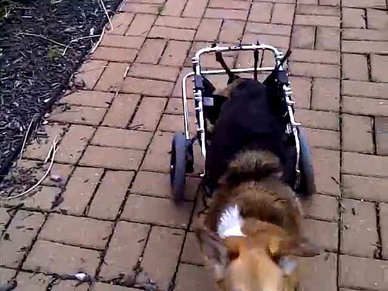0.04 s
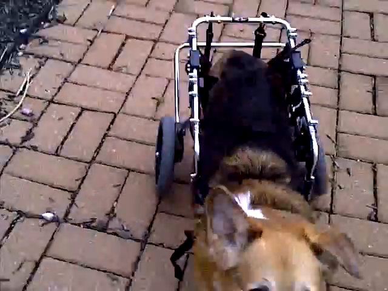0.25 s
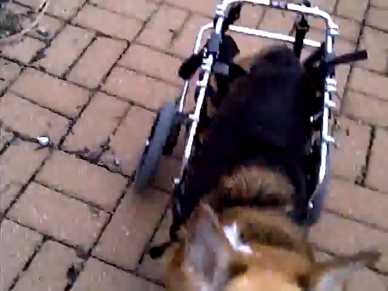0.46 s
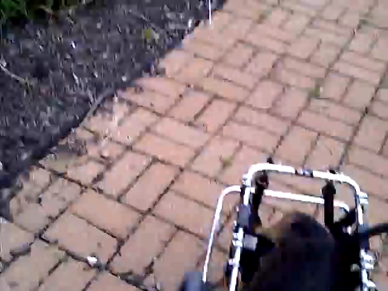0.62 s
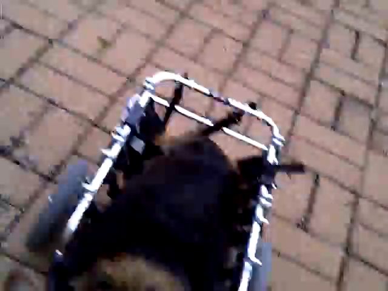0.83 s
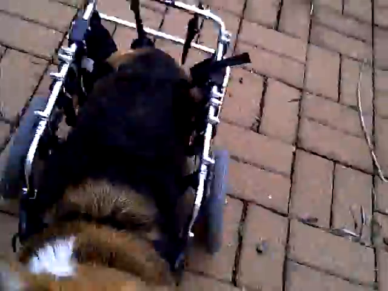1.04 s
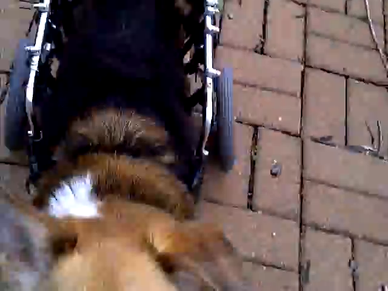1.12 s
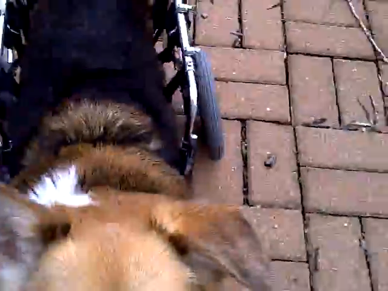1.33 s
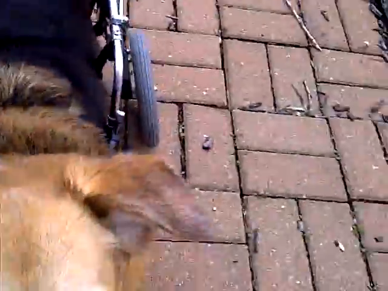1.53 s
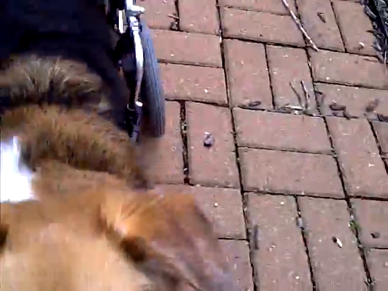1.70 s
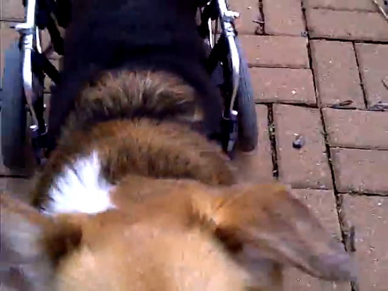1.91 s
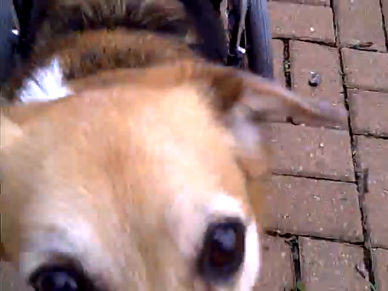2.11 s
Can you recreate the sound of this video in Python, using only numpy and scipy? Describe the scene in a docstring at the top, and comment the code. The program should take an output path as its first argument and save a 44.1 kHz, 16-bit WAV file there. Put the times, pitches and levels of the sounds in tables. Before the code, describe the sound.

A small cart rolls and knocks over bricks outdoors, close by, with sharp clicks from its fittings and a dog's claws. Rustling strokes of fur join in, then ease as a distant bird's thin falling whistles come through.

```python
"""A dog in a two-wheeled cart walks up a brick path, close by.
From the start the tyres rumble and hiss, claws and fittings click, and the frame knocks over the joints.
Almost at once a small bird joins in from behind with thin falling whistles.
From about half a second, fur brushes past in strokes. In the second half the frame drones three times
on rough bricks, and near the end the bird sings its loudest."""
import sys
import numpy as np
from scipy import signal
from scipy.fft import rfft, irfft, next_fast_len
from scipy.io import wavfile
from scipy.ndimage import map_coordinates

SR = 44100
rng = np.random.default_rng(int(sys.argv[2]) if len(sys.argv) > 2 else 0)


def generate_wav(signal):
    """Clip the signal to [-1, 1] and save it as 16-bit WAV at the path in sys.argv[1]."""
    frames = np.transpose(np.atleast_2d(signal))
    scaled = np.clip(frames, -1, 1) * 32767
    pcm = np.round(scaled).astype(np.int16)
    wavfile.write(sys.argv[1], SR, pcm)


N = 94815


def amp(db):
    """Turn decibels (dB) into a number to multiply by."""
    return 10 ** (np.asarray(db) / 20)


def unit(x):
    """Scale a sound to an average strength (rms) of 1."""
    return x / np.sqrt(np.mean(x ** 2) + 1e-20)


def gains(rows):
    """Turn rows of time and levels into one volume curve per level column."""
    times, *columns = np.transpose(rows)
    return [amp(np.interp(np.arange(N) / SR, times, db)) for db in columns]


def wobble(rate):
    """A smooth curve through `rate` random values a second."""
    return map_coordinates(rng.standard_normal(2000), [np.arange(N) * rate / SR], mode="wrap")


def filtered(x, response):
    """Turn each frequency up or down by response(hz)."""
    size = next_fast_len(N + 8192)
    return irfft(rfft(x, size) * response(np.fft.rfftfreq(size, 1 / SR)), size)[:N]


def coloured(x, tone):
    """Shape a sound's bass and treble with a tone table, at strength 1."""
    points_hz, db = np.transpose(tone)
    return unit(filtered(x, lambda hz: amp(np.interp(np.log(hz + 1), np.log(points_hz), db))))


def noise(tone):
    """A steady rush with the given tone."""
    return coloured(rng.standard_normal(N), tone)


def bristles(slips_per_s=2200, share=0.34):
    """Many tiny slips, as of hair or grit, over a smooth rush."""
    slips = (rng.random(N) < slips_per_s / SR) * rng.standard_normal(N)
    return np.sqrt(share) * unit(slips) + np.sqrt(1 - share) * rng.standard_normal(N)


def add(track, start, sound):
    """Mix a sound into the track, `start` seconds in."""
    part = track[max(0, round(start * SR)):][:len(sound)]
    part += sound[:len(part)]


# The tone of the air. Each row: frequency in Hz, relative level in dB.
AIR_TONE = [(20, -2), (100, 5.5), (280, -3), (500, -5), (900, -0.5), (2000, -10), (3500, -15), (6000, -19),
            (7500, -21.5)]


def air(level_db=-63.5):
    """Still outdoor air makes a faint, even rush."""
    return amp(level_db) * noise(AIR_TONE)


# How loud the tyres rumble and hiss. Each row: time in seconds, relative level in dB.
RUMBLE_LEVELS = [(0, -64), (.08, -61), (.12, -63), (.16, -57.5), (.22, -46), (.3, -54.5), (.36, -57.5),
                 (.41, -45.5), (.47, -50), (.5, -40.5), (.575, -43), (.61, -48), (.66, -50.5), (.71, -44),
                 (.84, -48), (.94, -39), (1.0, -61), (1.09, -62), (1.17, -44), (1.23, -63), (1.3, -41),
                 (1.38, -50), (1.44, -56.5), (1.5, -51.5), (1.6, -62.5), (1.78, -56.5), (1.86, -47),
                 (1.96, -79), (2.04, -82), (2.15, -52)]
HISS_LEVELS = [(0, -82), (.1, -63.5), (.17, -59.5), (.24, -53.5), (.33, -53), (.42, -50.5), (.48, -55.5),
               (.62, -77.5), (.89, -56.5), (.93, -45.5), (1.0, -50), (1.04, -77), (1.1, -63), (1.58, -70),
               (1.68, -55.5), (1.78, -59.5), (1.85, -48), (1.92, -56.5), (2.03, -54.5), (2.1, -58),
               (2.15, -58)]
# The tone of the rumble and of the hiss. Each row: frequency in Hz, relative level in dB.
RUMBLE_TONE = [(20, -27.5), (45, -21.5), (70, -10), (120, -4), (200, -7.5), (300, -7), (600, -19.5),
               (2000, -70)]
HISS_TONE = [(300, 5.5), (700, 2.5), (1200, 0), (2000, 4), (2800, 6), (3600, 0), (4700, -7), (5700, -32.5),
             (7000, -36.5)]


def wheels():
    """The tyres rumble over the bricks and hiss on their grit."""
    rumble_volume, = gains(RUMBLE_LEVELS)
    hiss_volume, = gains(HISS_LEVELS)
    unevenness = amp(-4 + 3.8 * wobble(rate=29))
    rumble = rumble_volume * unevenness * noise(RUMBLE_TONE)
    return rumble + hiss_volume * coloured(bristles(), HISS_TONE)


# Sharp clicks. Each row: start in seconds, level in dB, pitch in Hz, seconds to fade by 60 dB,
# then grit and overtone in dB compared with the main note.
CLAW_AND_FITTING_CLICKS = [(.0432, -50, 5400, 0.0056, 1, -10), (0.4515, -26, 2640, 0.0055, -3.5, -8.5),
                           (0.4528, -21, 2800, 0.005, -10, 1), (.4615, -29.5, 1280, 0.0082, -16, -25),
                           (0.4948, -31.5, 2110, 0.0086, -2, -18), (.553, -34, 3250, 0.014, 9, 1),
                           (0.746, -25.5, 1650, 0.0041, -16, -21), (0.8704, -13.5, 3060, 0.0035, -5, -13.5),
                           (1.3676, -13.5, 1540, 0.003, -5, -10), (1.5436, -28.5, 3220, 0.0071, -9.5, -30),
                           (1.5433, -20.5, 1685, 0.0047, -9, -12), (1.646, -42.5, 3700, 0.0057, -5, -15),
                           (1.762, -54, 4380, 0.0068, 10.5, -6), (2.021, -56, 4500, 0.0047, 5, 5)]


def clicks(attack_s=0.0001, overtone_hz=5590):
    """Claws and fittings hit hard: a very short ring, a bright overtone and a crack of grit."""
    out, t = np.zeros(N), np.arange(SR // 20) / SR
    for start, db, hz, fade_s, grit_db, overtone_db in CLAW_AND_FITTING_CLICKS:
        ring = np.sin(2 * np.pi * hz * t) - amp(overtone_db) * np.sin(2 * np.pi * overtone_hz * t)
        crack = amp(grit_db) * rng.standard_normal(len(t))
        rise = 1 - np.exp(-t / attack_s)
        add(out, start, amp(db) * (ring + crack) * rise * amp(-60 * t / fade_s))
    return out


# Dull knocks. Each row: start in seconds, relative level in dB, pitch in Hz, seconds to fade by 60 dB.
CART_JOLTS = [(0.0446, -35.5, 372, 0.01), (0.113, -44.5, 87, 0.062), (0.188, -37, 143, 0.02),
              (0.2391, -24.5, 470, 0.012), (.274, -45.5, 550, 0.044), (0.3809, -33.5, 460, 0.025),
              (0.3916, -33, 169, 0.057), (0.3995, -32, 151, 0.025), (0.453, -19, 1170, 0.0073),
              (0.457, -32.5, 173, 0.041), (0.461, -26.5, 118, 0.031), (0.466, -33, 403, 0.055),
              (0.5383, -24, 567, 0.016), (0.5421, -20, 198, 0.015), (0.548, -32.5, 190.5, 0.094),
              (0.554, -19.5, 316, 0.0092), (.574, -35.5, 85, 0.034), (0.743, -21.5, 265, 0.01),
              (0.7456, -21.5, 533, 0.011), (.7498, -18, 294, 0.03), (.794, -34.5, 182.4, 0.19),
              (0.8046, -24, 252, 0.021), (0.8055, -21.5, 770, 0.013), (0.871, -26.5, 202, 0.021),
              (0.8789, -16, 276, 0.013), (1.2969, -27.5, 329, 0.035), (1.3676, -32, 244, 0.036),
              (1.3683, -20.5, 640, 0.0064), (1.413, -36.5, 440, 0.02), (1.5011, -34.5, 454, 0.015),
              (1.508, -32, 326, 0.0089), (1.5435, -20, 441, 0.018), (1.5544, -41, 450, 0.018),
              (1.586, -39.5, 746, 0.0079), (1.82, -34.5, 208, 0.041), (1.8332, -39, 199, 0.044),
              (1.871, -52, 258, 0.037), (2.037, -46.5, 320, 0.03)]
# The hollow notes of the tube frame. Each row: pitch in Hz, level in dB compared with the thud.
FRAME_NOTES = [(530, -18.5), (690, -18), (880, -25.5), (1280, -25)]
# The tone of a scuff. Each row: frequency in Hz, relative level in dB.
SCUFF_TONE = [(100, -37), (400, 11), (900, 10), (1800, -17), (4000, -13), (7000, -31)]


def knocks(attack_s=0.00085, scuff_db=-15, scuff_fade_s=0.017, ring_fade_s=0.022):
    """Each jolt thuds in the padded cart, with a short scuff and the hollow ring of the frame."""
    out, t = np.zeros(N), np.arange(SR // 10) / SR
    for start, db, hz, fade_s in CART_JOLTS:
        thud = np.sin(2 * np.pi * hz * t) * amp(-60 * t / fade_s)
        scuff = noise(SCUFF_TONE)[:len(t)] * amp(scuff_db - 60 * t / scuff_fade_s)
        notes = sum(amp(note_db) * np.sin(2 * np.pi * (note_hz * t + rng.random()))
                    for note_hz, note_db in FRAME_NOTES)
        ring = notes * amp(-60 * t / ring_fade_s)
        rise = 1 - np.exp(-t / attack_s)
        add(out, start, amp(db + 3.5) * (thud + scuff + ring) * rise)
    return out


# The bird's song. Each row: start in seconds, length in seconds, first pitch in Hz, last pitch in Hz,
# when the pitch slides (0 is the start, 1 the end), relative level in dB.
BIRD_WHISTLES = [(.085, .066, 4750, 4100, .68, -66.5), (.162, .06, 4430, 3250, .72, -55.5),
                 (.31, .125, 3980, 3850, .3, -61), (1.017, .051, 3080, 2990, .6, -68),
                 (1.563, .025, 4300, 4060, .5, -68), (1.635, .024, 3830, 3750, .5, -64),
                 (1.793, .027, 4650, 3920, .45, -63), (1.924, .063, 4530, 3400, .59, -52),
                 (1.987, .043, 4450, 3200, .38, -50), (2.03, .045, 3420, 3160, .68, -60),
                 (2.128, .04, 4020, 3980, .5, -61.5)]


def bird(slide_s=0.0099, louder_db_per_octave=24.5):
    """Each whistle holds, slides down and grows louder as it falls; the garden echoes it."""
    out = np.zeros(N)
    for start, length, first_hz, last_hz, moment, db in BIRD_WHISTLES:
        t = np.arange(int(length * SR)) / SR
        slide = (1 + np.tanh((t - moment * length) / slide_s)) / 2
        waver = 1 + 0.0063 * wobble(rate=60)[:len(t)]
        hz = (first_hz + (last_hz - first_hz) * slide) * waver
        flutter = amp(1.5 * wobble(rate=110)[:len(t)])
        volume = amp(db + 3 + louder_db_per_octave * np.log2(last_hz / hz))
        edges = np.abs(np.sin(np.pi * t / length)) ** 0.16  # a quick fade in and out
        add(out, start, flutter * volume * edges * np.sin(2 * np.pi * np.cumsum(hz) / SR))
    return garden(out)


def garden(x, swell_s=0.02, fade_s=0.28, echo_db=-6.5):
    """A distant sound arrives with a scattered echo that swells and dies away."""
    t = np.arange(SR // 2) / SR
    tail = rng.standard_normal(len(t)) * amp(-60 * t / fade_s) * (1 - np.exp(-t / swell_s))
    echo = signal.fftconvolve(x, tail / np.linalg.norm(tail))[:N]
    return x + amp(echo_db) * echo


# Strokes of fur. Each row: time in seconds, then relative levels of the rush and the fizz in dB.
FUR_STROKES = [(0, -91, -85.5), (.37, -83, -74.5), (.44, -58, -62), (.475, -56.5, -71.5),
               (.505, -54.5, -56.5), (.535, -45, -55.5), (.556, -39.5, -45), (.58, -43, -57.5),
               (.615, -56, -68), (.655, -51, -65), (.686, -46.5, -54), (.73, -42.5, -53),
               (.756, -36.5, -40.5), (.783, -44.5, -53.5), (.81, -40.5, -46.5), (.855, -44.5, -54.5),
               (.885, -46.5, -64.5), (.91, -43.5, -59.5), (.97, -48, -61), (1.018, -41.5, -58),
               (1.038, -57.5, -79), (1.095, -69, -87), (1.128, -44.5, -59.5), (1.18, -44, -61),
               (1.23, -39, -52.5), (1.28, -44.5, -59.5), (1.31, -41.5, -56), (1.36, -43.5, -63.5),
               (1.38, -48.5, -61.5), (1.402, -42, -56), (1.43, -55, -70.5), (1.465, -51, -66.5),
               (1.485, -63.5, -79), (1.515, -52, -69.5), (1.532, -66.5, -84), (1.555, -53, -74),
               (1.58, -62.5, -90), (1.81, -70.5, -85.5), (1.86, -56.5, -76), (1.91, -60.5, -89),
               (2.15, -67.5, -89)]
# The tone of the rush and of the fizz. Each row: frequency in Hz, relative level in dB.
RUSH_TONE = [(100, -7.5), (250, 1), (450, -4.5), (700, -1), (880, 1), (1050, -2.5), (1400, -2.5),
             (2200, -9), (3200, -11.5), (4500, -29), (7000, -25.5)]
FIZZ_TONE = [(1000, -53), (2500, -2.5), (4000, 1.5), (5600, 1), (6500, -0.5), (7500, -17)]


def fur():
    """Fur brushes past with uneven pressure: its slipping hairs make a soft rush and a fine fizz."""
    rush_volume, fizz_volume = gains(FUR_STROKES)
    pressure = amp(1.63 * wobble(rate=96))
    rush = rush_volume * coloured(bristles(), RUSH_TONE)
    fizz = amp(3.5) * fizz_volume * coloured(bristles(), FIZZ_TONE)
    return pressure * (rush + fizz)


# Low drones. Each row: start in seconds, length in seconds, relative level in dB, pitch in Hz.
FRAME_DRONES = [(1.261, 0.072, -39, 320), (1.324, 0.057, -39.5, 269), (1.809, 0.11, -49.5, 290)]


def drones(half_width_hz=79):
    """On rough bricks, short swells of rumble set the frame humming around a low note."""
    out = np.zeros(N)
    for start, length, db, hz in FRAME_DRONES:
        hum = filtered(rng.standard_normal(N), lambda f: 1 / (1 + ((f - hz) / half_width_hz) ** 2))
        swell = np.sin(np.linspace(0, np.pi, int(length * SR)))
        add(out, start, amp(db + 0.5) * swell * unit(hum[:len(swell)]))
    return out


def scene():
    """Cart, dog and bird over still outdoor air, in one channel."""
    return (air() + wheels() + clicks() + knocks() + bird() + fur() + drones())[None]


def record(dry, low_cut_hz=53.4, dull_hz=6660, top_hz=7400):
    """A small microphone loses the deep bass and dulls the treble; the very top is cut off."""
    x = signal.sosfilt(signal.butter(2, low_cut_hz, "high", fs=SR, output="sos"), dry[0])
    x = filtered(x, lambda hz: 1 / np.sqrt(1 + (hz / dull_hz) ** 20))
    return filtered(x, lambda hz: 1 / np.sqrt(1 + (hz / top_hz) ** 46))[None]


dry = scene()
out = record(dry)
generate_wav(out)
```